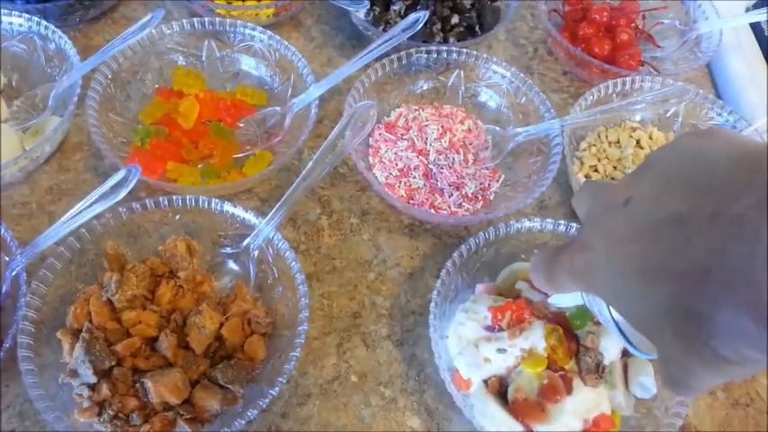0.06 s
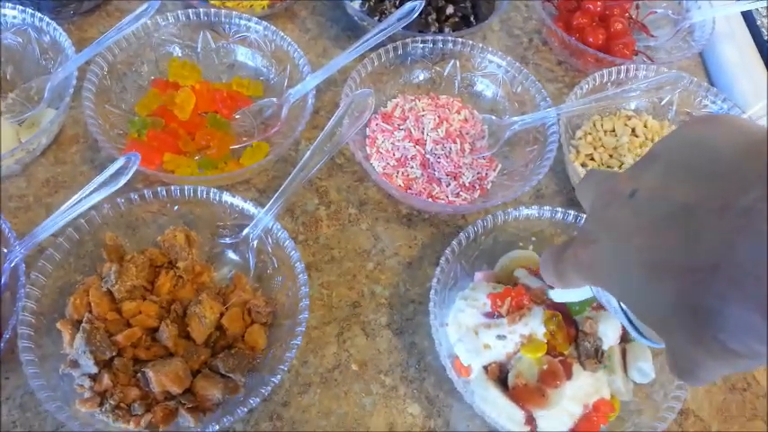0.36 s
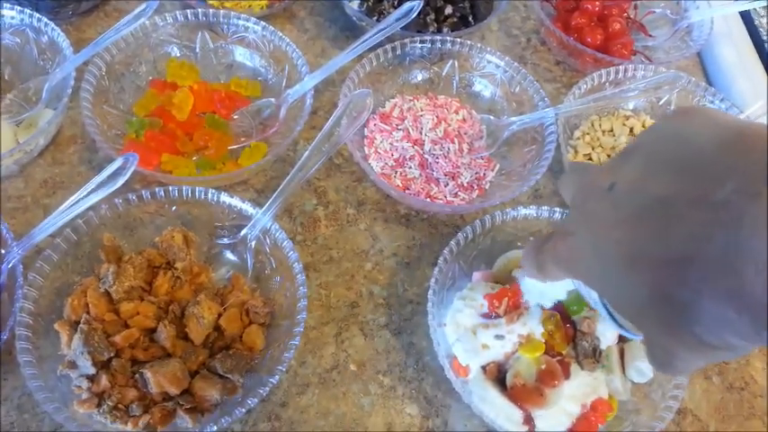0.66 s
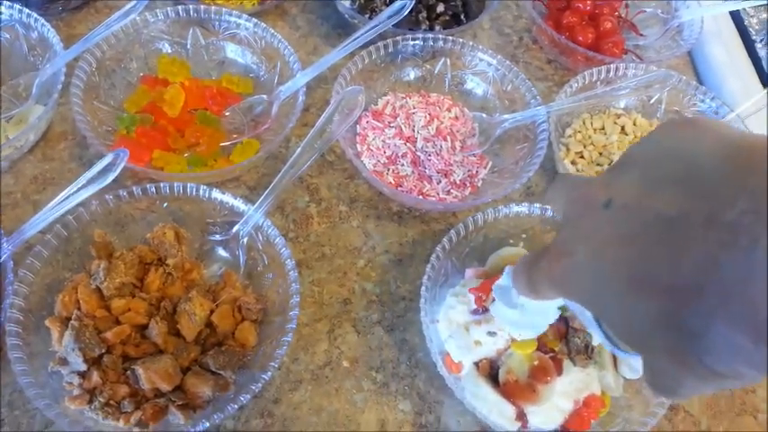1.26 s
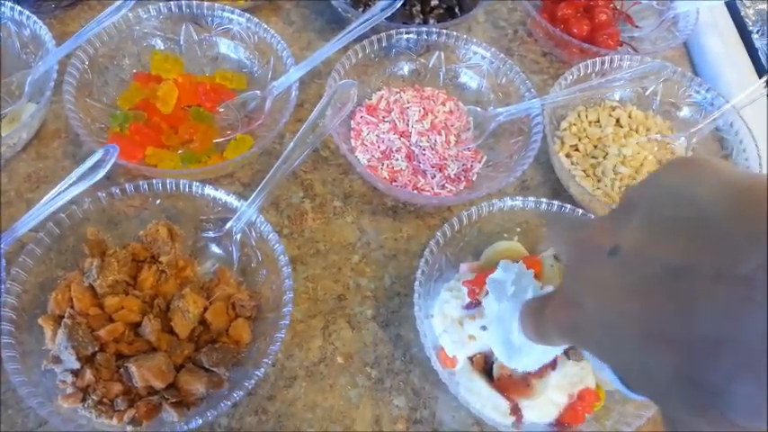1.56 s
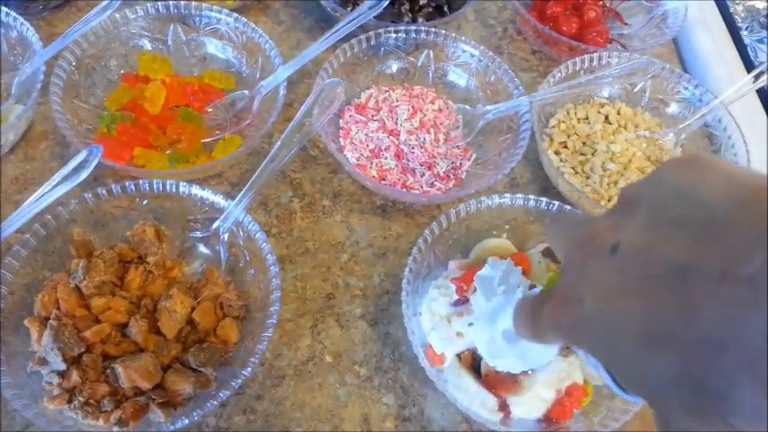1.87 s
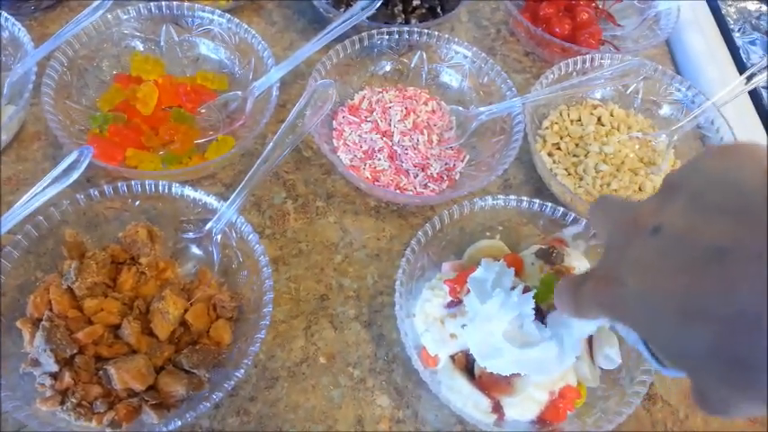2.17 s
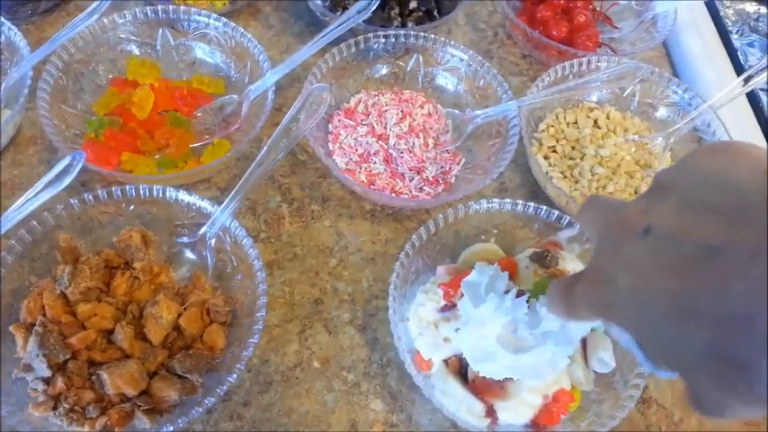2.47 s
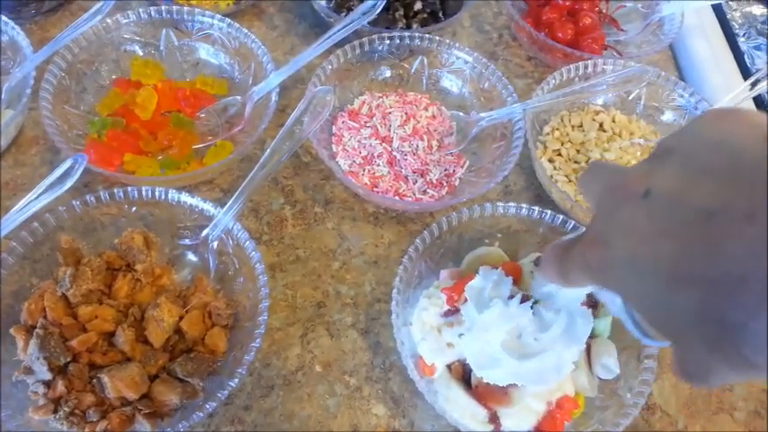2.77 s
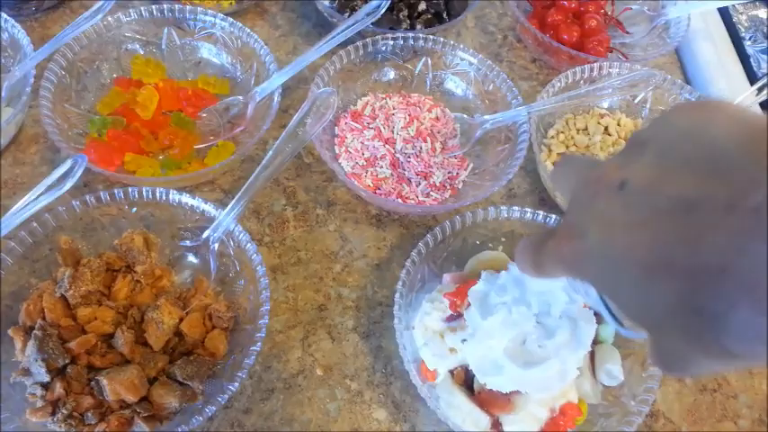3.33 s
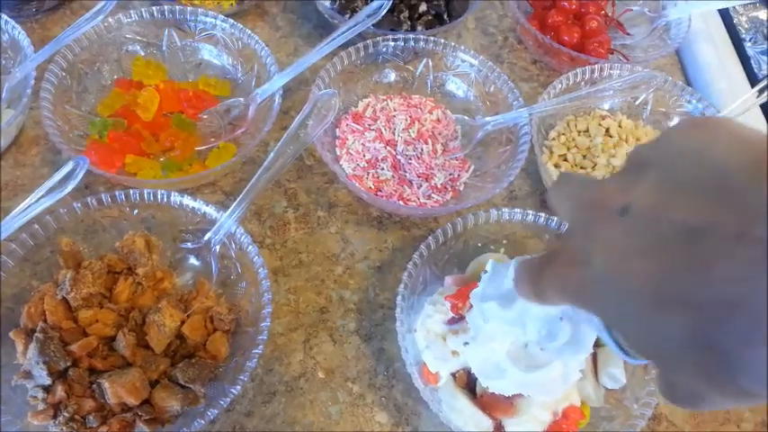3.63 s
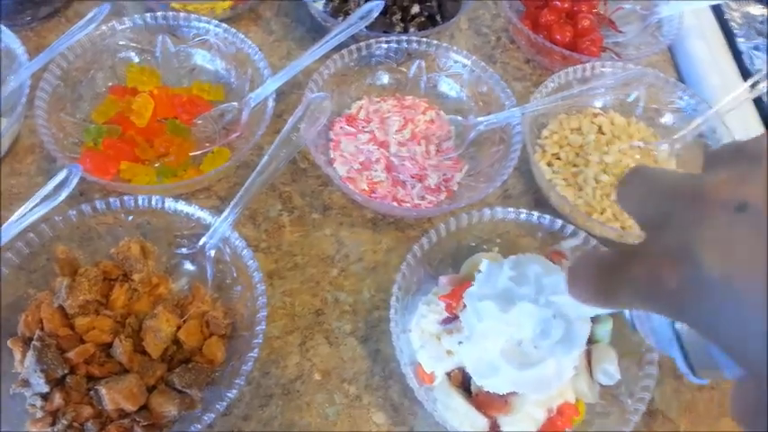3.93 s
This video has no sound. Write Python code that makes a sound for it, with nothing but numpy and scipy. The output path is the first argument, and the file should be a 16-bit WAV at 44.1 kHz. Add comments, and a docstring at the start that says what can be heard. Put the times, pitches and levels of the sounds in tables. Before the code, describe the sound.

Whipped cream sprays from an aerosol can, close by on the right, in a small shop. The high hiss starts with a spit, turns more sputtery and gurgling, then cuts off. Faint ventilation hums behind.

```python
"""An aerosol can sprays whipped cream onto a dessert, close by on the right, in a small shop.
Turbulent gas hisses through the nozzle's resonances, while bursting foam excites the hollows
of nozzle and cream and sputters, more as the can empties. Now and then cream chokes the valve
and breaks free. Counter and room reflect the spray; ventilation rumbles and hums behind."""
import sys
import numpy as np
from scipy import signal
from scipy.fft import rfft, irfft, next_fast_len
from scipy.io import wavfile
from scipy.ndimage import map_coordinates

SR = 44100
rng = np.random.default_rng(int(sys.argv[2]) if len(sys.argv) > 2 else 0)


def digitize_waveform(pressure):
    """Quantize a signal to 16-bit integers and store it at the path in sys.argv[1].

    Rows of a 2-D input are taken as channels; values are limited to [-1, 1].
    """
    field = np.atleast_2d(pressure).T
    bounded = np.clip(field, -1, 1)
    quanta = np.round(bounded * 32767).astype(np.int16)
    wavfile.write(sys.argv[1], SR, quanta)


N = 176400

# Spectra of the noises. Each row: frequency in Hz, relative level in dB.
AIR_COLOUR = [(60, -40), (100, -25.5), (150, -2), (190, -1), (240, -7.5), (310, -4.5), (400, -10.5),
              (520, -10.5), (700, -16.5), (1000, -15), (2400, -28.5), (4000, -34.5), (15000, -43)]
RUMBLE_COLOUR = [(20, -1), (45, -12), (85, 9), (130, -3), (400, -70.5)]
POP_COLOUR = [(200, -24), (450, -17.5), (900, -14.5), (1500, -8), (2200, -8), (3200, 1), (5000, 2.5),
              (6000, -2), (7500, 1), (15000, -36)]
HISS_COLOUR = [(1500, -43), (3500, -26), (4400, -17.5), (4900, -13), (5600, -16.5), (6300, -8.5),
               (6900, -2), (7350, 0), (7800, -3), (8300, -7), (9100, -16.5), (10500, -21), (15000, -30)]
FIZZ_COLOUR = [(3000, -39), (5000, -20), (6000, 2), (9300, 14), (10300, 8), (11500, 6), (12700, -2),
               (14000, 2)]
SPUTTER_COLOUR = [(60, -48), (120, -25.5), (200, -16), (300, -4), (440, -1), (560, -6.5), (680, -15.5),
                  (830, -3.5), (950, -20.5), (1150, -8), (1400, -3), (1580, -1.5), (1750, -4), (2030, -2),
                  (2400, -6.5), (2850, -4.5), (3300, -7.5), (4800, -7.5), (6000, -5), (7400, -11),
                  (10000, -17.5), (15000, -42)]
GURGLE_COLOUR = [(1800, -29.5), (2450, -5), (2780, 3.5), (3100, -1), (3500, -4), (3900, -6), (4500, -8),
                 (7000, -24.5)]
# Envelopes of the layers. Each row: time in seconds, relative level in dB.
RUMBLE_LEVEL = [(0, -54), (.55, -60), (.75, -68.5), (3.7, -74), (3.85, -63.5), (4, -56)]
HISS_LEVEL = [(0.24, -21), (0.4, -23.5), (0.53, -21.5), (0.66, -19.5), (0.87, -19), (1.08, -19.5),
              (1.22, -19), (2.05, -19), (2.4, -20), (2.78, -20), (2.92, -20.5), (3.2, -19.5), (3.46, -22.5),
              (3.49, -20), (3.56, -20.5), (3.59, -22.5), (3.65, -20), (3.8, -25.5)]
FIZZ_LEVEL = [(.24, -35.5), (.6, -33.5), (1.0, -32.5), (1.3, -28.5), (1.9, -31), (2.13, -36), (2.35, -28),
              (2.7, -31.5), (3.0, -34), (3.25, -28.5), (3.55, -28.5), (3.8, -37.5)]
SPUTTER_LEVEL = [(0.24, -37), (0.3, -35), (0.37, -33.5), (0.44, -40.5), (0.56, -43.5), (0.68, -33),
                 (1.18, -33.5), (1.28, -28.5), (1.42, -29.5), (1.52, -31.5), (1.9, -29), (2.05, -31.5),
                 (2.4, -30.5), (3.55, -30), (3.72, -32.5), (3.79, -33)]
GURGLE_LEVEL = [(.24, -43), (.6, -40), (1.9, -50), (2.4, -38.5), (2.92, -40), (3.03, -27.5), (3.11, -36),
                (3.3, -30.5), (3.52, -31.5), (3.72, -37.5), (3.775, -28), (3.81, -37)]  # grows as the cream piles up
PLOP_LEVEL = [(.3, -35.5), (.38, -38), (.46, -52), (.6, -47), (.67, -39.5), (.9, -39), (1.02, -44),
              (1.2, -39.5), (1.26, -32.5), (1.32, -38), (1.4, -34), (1.52, -44), (1.79, -39), (1.9, -30.5),
              (1.99, -39), (2.4, -36.5), (2.92, -38), (3.03, -32.5), (3.12, -38.5), (3.57, -35.5),
              (3.8, -40)]
# Spits of gas. Each row: start in seconds, relative level in dB, time constant of power in seconds.
POPS = [(0.232, -14, .0004), (0.2415, -23, .012), (0.253, -15, .0005), (0.2742, -14, .0012),
        (0.28, -23, .012), (0.3125, -23, .004), (1.906, -19, .002), (2.194, -17, .0008),
        (2.4312, -15, .002), (2.503, -15, .0008), (2.982, -18, .001), (3.2455, -18, .001),
        (3.5693, -13, .0005), (3.6575, -15, .0006), (3.7695, -17, .0012)]
# Chokes of the valve. Each row: time of clearing in seconds, length in seconds, nominal depth in dB.
CHOKES = [(1.135, .03, 2.5), (1.712, .03, 6), (2.193, .05, 3.5), (2.525, .022, 5.5), (2.70, .03, 4),
          (2.983, .03, 4.5), (3.125, .025, 3.5), (3.39, .02, 3.5), (3.4825, .02, 9.5), (3.678, .014, 7),
          (3.735, .03, 3)]
# Drifting resonances. Each row: time in seconds, nominal centre in Hz.
NOZZLE_MAIN = [(0.25, 7480), (2.05, 7485), (2.43, 7392), (3.44, 7225), (3.75, 7466)]
NOZZLE_UPPER = [(.25, 8320), (.6, 8490), (.9, 8670), (1.15, 8084), (1.6, 7854), (2.05, 8190), (2.3, 7870),
                (2.8, 7750), (3.3, 7963), (3.8, 8046)]  # moves with the gap to the cream
CREAM_HOLLOW = [(.24, 1575), (1.95, 1447), (2.7, 1535), (3.8, 1470)]
# Likeness of the two channels. Each row: frequency in Hz, left-right correlation.
SHOP_ALIKE = [(50, 0.4), (180, 0.52), (500, 0.83), (1500, 0.088), (8000, .1)]
JET_ALIKE = [(200, 1), (600, 0.72), (1400, 0.28), (3000, 0.5), (7000, 0.17), (10000, 0.056)]
# Balance of the spray. Each row: frequency in Hz, left minus right level in dB.
BALANCE = [(60, 16), (99, 36), (160, -24), (270, -5), (450, 0), (740, -1.5), (1220, -12), (2010, -10.5),
           (3330, -7.5), (5500, -12), (9080, -20.5), (15000, -6.5)]
# Reverberation. Each row: frequency in Hz, time to fall 60 dB in seconds.
ROOM_T60 = [(200, .45), (1500, .25), (4000, .22), (7300, .27), (14000, .22)]


def amp(db):
    """Decibels to amplitude ratio."""
    return 10 ** (np.asarray(db) / 20)


def unit(x):
    """Scale to rms 1."""
    return x / np.sqrt(np.mean(x ** 2) + 1e-20)


def along(points, hz):
    """Interpolate (Hz, value) points on a log axis."""
    f, v = np.transpose(points)
    return np.interp(np.log(hz + 1), np.log(f + 1), v)


def curve(rows):
    """Interpolate (seconds, value) points at every sample."""
    return np.interp(np.arange(N) / SR, *np.transpose(rows))


def wobble(rate):
    """Smooth random modulation with rate knots a second."""
    return map_coordinates(rng.standard_normal(int(N * rate / SR) + 4), [np.arange(N) * rate / SR])


def filtered(x, response):
    """Linear filtering: multiply the spectrum by a frequency response."""
    m = next_fast_len(N + SR // 2)
    return irfft(rfft(x, m) * response(np.fft.rfftfreq(m, 1 / SR)), m)[..., :N]


def ringing(x, colour):
    """A minimum-phase filter rings only after it is excited."""
    def response(hz):
        cepstrum = irfft(np.log(amp(along(colour, hz))))
        half = len(cepstrum) // 2
        return np.exp(rfft(cepstrum * np.r_[1, np.full(half - 1, 2), np.zeros(half)]))
    return filtered(x, response)


def noise_pair(alike):
    """Partly coherent white noise: the sum and difference of two independent noises."""
    def weights(hz):
        angle = np.arccos(np.clip(along(alike, hz), -1, 1)) / 2
        return np.array([np.cos(angle), np.sin(angle)])
    mid, side = filtered(rng.standard_normal((2, N)), weights)
    return np.array([mid + side, mid - side])


def coloured(alike, colour):
    """Spectrally shaped stereo noise of rms 1."""
    return unit(filtered(noise_pair(alike), lambda hz: amp(along(colour, hz))))


def read_at(pair, place):
    """Interpolate both channels at fractional sample positions."""
    return np.array([map_coordinates(x, [place], order=5, mode="mirror") for x in pair])


def drifting(centre, response):
    """Resampling slides the spectrum of a noise in proportion to centre."""
    noise = filtered(noise_pair(JET_ALIKE), response)
    return unit(read_at(noise, np.cumsum(centre / centre.mean())))


def fading(kicks, life_s):
    """Damping: each kick of power decays exponentially."""
    return np.abs(signal.lfilter([1], [1, -np.exp(-1 / (life_s * SR))], kicks))


def spurts(kicks, life_s, steady):
    """Envelope of steady flow plus bursts, which add in power."""
    power = fading(kicks, life_s)
    return np.sqrt(steady + (1 - steady) * power / power.mean())


def ventilation(hum_hz=195):
    """Broadband air noise and rumble superpose on a hum that wavers in phase and level."""
    air = coloured(SHOP_ALIKE, AIR_COLOUR)
    rumble = coloured(SHOP_ALIKE, RUMBLE_COLOUR)
    hum = np.sqrt(2) * np.sin(2 * np.pi * hum_hz * np.arange(N) / SR + 0.82 * wobble(12))
    return amp(-45.5) * air + amp(curve(RUMBLE_LEVEL)) * rumble + amp(-50 + 1.4 * wobble(4.7)) * hum


def pops():
    """Impulsive excitation: the valve ticks open and gas pockets spit out of the nozzle."""
    power = sum(fading(amp(db) ** 2 * (np.arange(N) == round(s * SR)), life_s) for s, db, life_s in POPS)
    filter_rms = np.sqrt(np.mean(amp(along(POP_COLOUR, np.linspace(0, SR / 2, num=512))) ** 2))
    return ringing(noise_pair(JET_ALIKE) * np.sqrt(power), POP_COLOUR) / filter_rms


def valve(clogging, open_s=0.232, close_s=3.808, attack_s=0.00041, release_s=0.005, surge_s=0.17):
    """Throttling sets the jet's gain: chokes, scaled by clogging, build up and clear with a surge."""
    t = np.arange(N) / SR
    choke_db = 0
    for clear_s, length, depth in CHOKES:
        clog = np.sqrt(np.clip(1 - (clear_s - t) / length, 0, 1))
        surge = 0.18 * np.exp(-np.abs(t - clear_s) / surge_s)
        choke_db = choke_db + depth * np.where(t < clear_s, -clog, surge)
    opening = np.clip((t - open_s) / attack_s, 0, 1)
    closing = np.exp(-np.maximum(t - close_s, 0) / release_s)
    return opening * closing * amp(clogging * choke_db)


def bubbles(per_s=600, spread_db=1):
    """Small bubbles burst in the nozzle as a Poisson process, each a kick of power."""
    power = amp(spread_db * np.minimum(rng.standard_normal(N), 1.8)) ** 2
    return power * (rng.random(N) < per_s / SR)


def hiss(kicks, half_width_hz=270):
    """Two nozzle resonances filter the gas noise and drift as the can moves; droplets fizz above."""
    upper_hz = curve(NOZZLE_UPPER)
    main = drifting(curve(NOZZLE_MAIN), lambda hz: amp(along(HISS_COLOUR, hz)))
    upper = drifting(upper_hz, lambda hz: 1 / (1 + ((hz - upper_hz.mean()) / half_width_hz) ** 2))
    gas = (main + amp(-10) * upper) * amp(curve(HISS_LEVEL) - 1.04)
    fizz = coloured(JET_ALIKE, FIZZ_COLOUR) * amp(curve(FIZZ_LEVEL))
    return (gas + fizz) * spurts(kicks, life_s=0.0013, steady=0.63) * amp(0.49 * wobble(35))


def sputter(kicks):
    """Cavity resonance: bursting foam rings the hollows of nozzle and cream, gurgling near 2.8 kHz."""
    bursts = spurts(kicks, life_s=0.00026, steady=0.44) * amp(1.46 * wobble(38.08))
    parts = [(SPUTTER_COLOUR, curve(SPUTTER_LEVEL) + 0.5), (GURGLE_COLOUR, curve(GURGLE_LEVEL))]
    return sum(unit(ringing(noise_pair(JET_ALIKE) * bursts, colour)) * amp(db) for colour, db in parts)


def plops(count=740, per_s=190, attack_s=0.0005, t60_s=0.018):
    """Larger bubbles ring as damped oscillators within 10% of the pitch of the cream's hollow."""
    t = np.arange(SR // 20) / SR
    jitter, detune, softness = rng.random((count, 3)).T
    start_s = (np.arange(count) + 2 * jitter) / per_s
    hz = np.interp(start_s, *np.transpose(CREAM_HOLLOW)) * (1 + 0.2 * (detune - 0.5))
    envelope = (1 - np.exp(-t / attack_s)) * amp(-60 * t / t60_s)
    rings = np.sin(2 * np.pi * hz[:, None] * t) * envelope * amp(-15 * softness[:, None])
    samples = (start_s * SR).astype(int)[:, None] + np.arange(len(t))
    sound = np.bincount(samples.ravel(), rings.ravel(), N)[:N]
    return unit(sound * amp(1.94 * wobble(25.02))) * amp(curve(PLOP_LEVEL))


def shadow(x):
    """Acoustic shadow: with the can on the right, the device's body shades its left microphone."""
    def response(hz):
        pair = amp(along(BALANCE, hz) * np.array([[0.5], [-0.5]]))
        return 2 * pair / np.sqrt((pair ** 2).sum(0) + 1)
    return filtered(x, response)


def counter(x, delay_s=0.00143):
    """Comb filtering: the counter top adds a reflection whose path changes as the can circles."""
    delay = delay_s * (1 + 0.065 * wobble(2.61))
    return x + 0.2 * read_at(x, np.arange(N) - delay * SR)


def room(x):
    """Reverberation: each frequency decays exponentially at its own rate."""
    hz, t, spectra = signal.stft(rng.standard_normal((2, SR // 2)), SR, nperseg=256)
    decay = amp(-60 * t / along(ROOM_T60, hz)[:, None])
    tail = signal.istft(spectra * decay, SR, nperseg=256)[1]
    return signal.fftconvolve(x, tail / np.linalg.norm(tail[0]), axes=1)[:, :N]


def scene():
    """Superposition of spray, echoes and ventilation; chokes hold back gas more than foam."""
    kicks = bubbles()
    gas = valve(clogging=1) * hiss(kicks)
    foam = valve(clogging=0.7) * (sputter(kicks) + plops())
    spray = counter(shadow(gas + foam + pops()))
    spray = signal.sosfilt(signal.butter(2, 130, "highpass", fs=SR, output="sos"), spray)
    return spray + amp(-11.8) * room(spray) + ventilation()


def record(dry):
    """Soft saturation rounds the highest peaks; a band limit removes all above 14.6 kHz."""
    rounded = dry / (1 + np.abs(dry / 0.92) ** 6) ** (1 / 6)
    return filtered(rounded, lambda hz: hz < 14600)


dry = scene()
out = record(dry)
digitize_waveform(out)
```